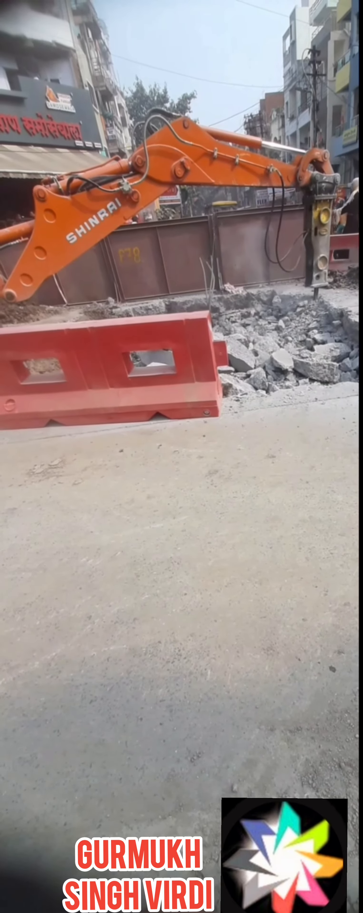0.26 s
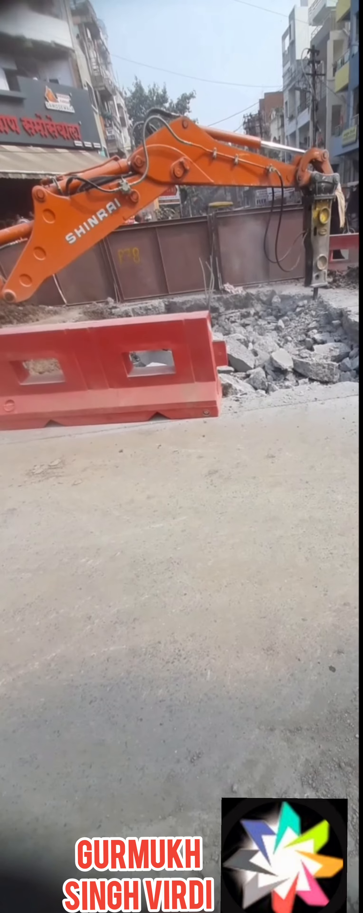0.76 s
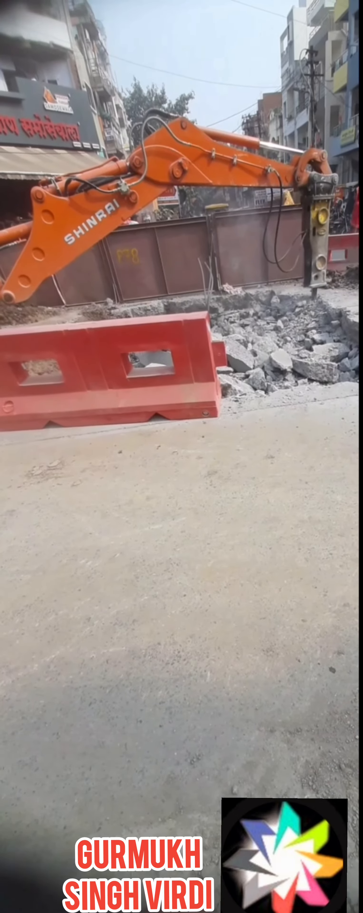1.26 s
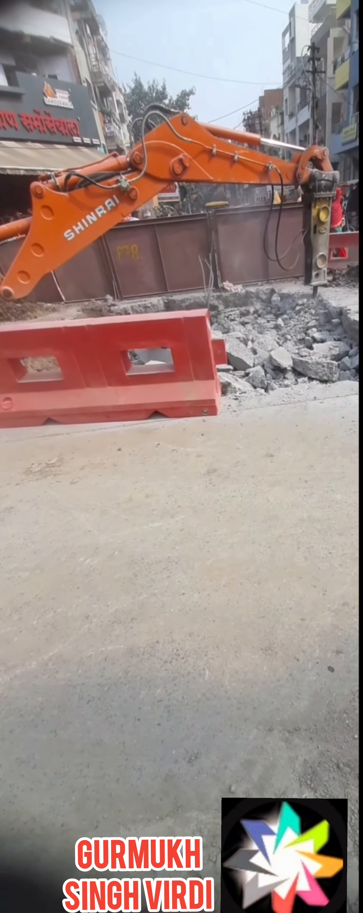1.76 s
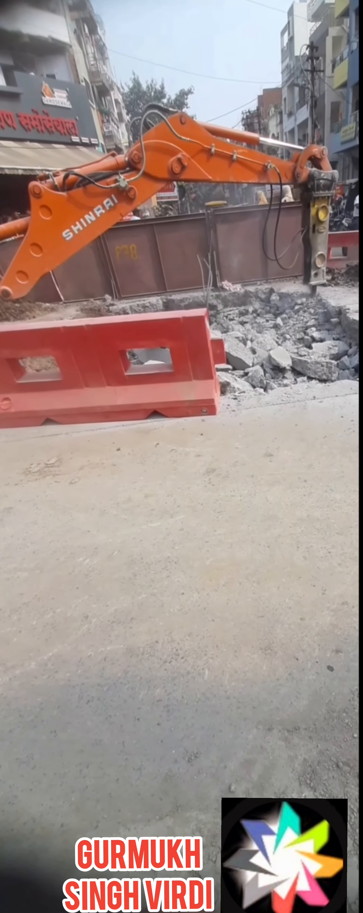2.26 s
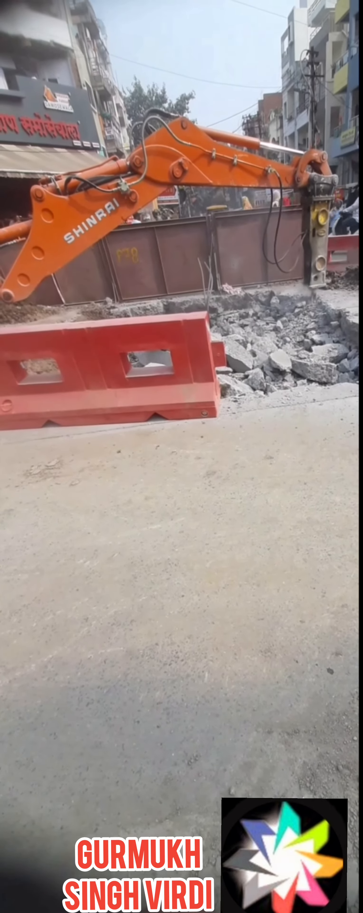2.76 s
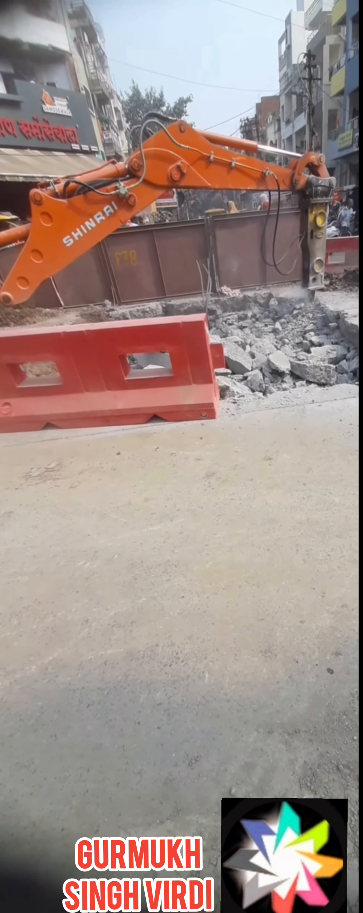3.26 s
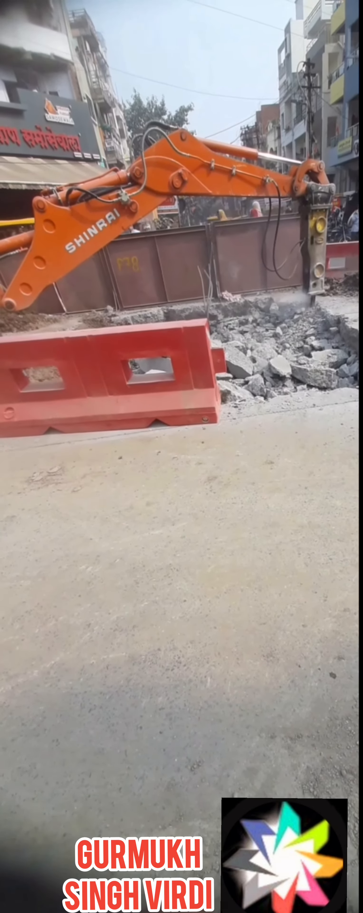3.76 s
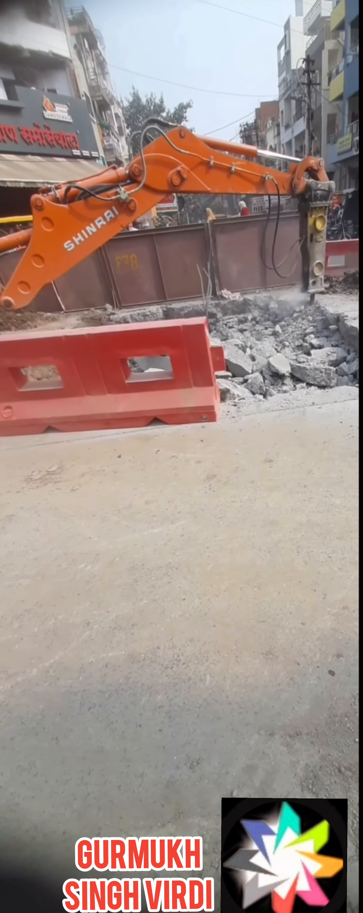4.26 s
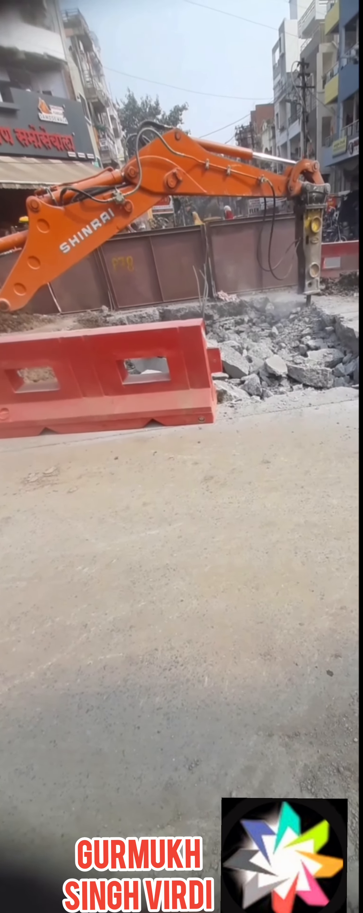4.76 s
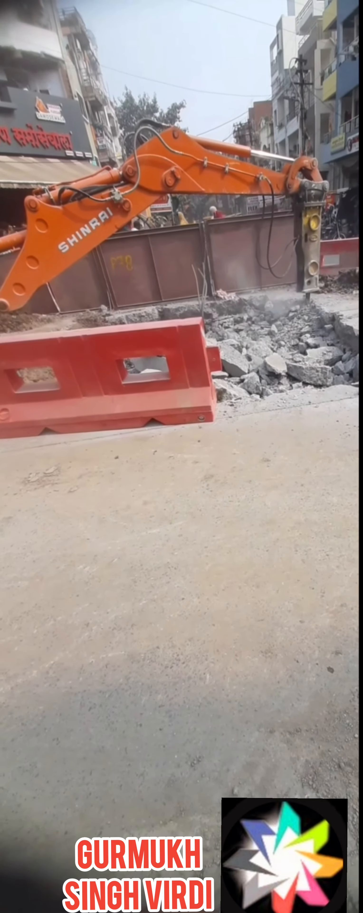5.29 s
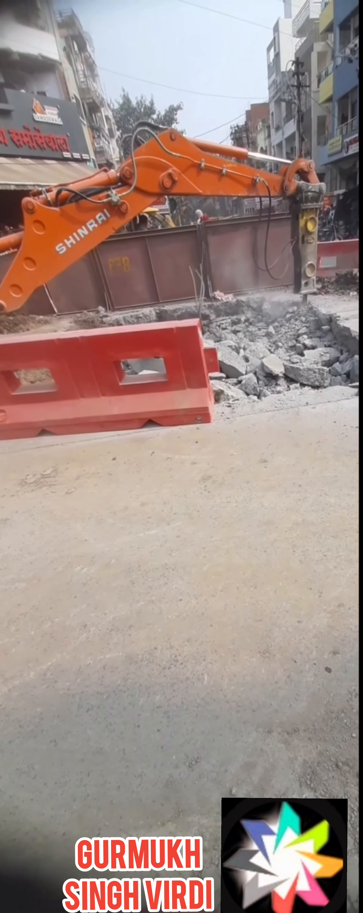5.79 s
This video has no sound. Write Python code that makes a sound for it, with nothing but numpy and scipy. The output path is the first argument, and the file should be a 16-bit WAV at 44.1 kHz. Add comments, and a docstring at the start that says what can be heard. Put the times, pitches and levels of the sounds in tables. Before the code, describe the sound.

Steady, fast jackhammering outdoors between buildings, picked up in stereo with the machine somewhat left of centre. Nearly identical bright cracks come first, with clear ringing steel and gritty chip ticks. In the middle the chisel skids, adding a hollow mid-low drone, a thin high ring and several short clanks. Then the pounding firms up, duller in its metal tone than at first. A low engine rumble fills the narrow gaps, and it ends mid-hammering.

```python
"""An excavator's hydraulic breaker pounds a concrete slab in a street, nine to ten blows a second.
Each cycle starts with valve hiss and a noise-burst crack; the jolted housing thumps, struck steel rings.
The arm drones, chips tick, and the house fronts answer with slower bursts of noise.
At first the blows are near copies of each other; later the slab gives way, the chisel skids and loose
pieces clank. From start to end, coloured noise makes the rumble of the diesel and the street."""
import sys
import numpy as np
from scipy import signal
from scipy.fft import rfft, irfft, next_fast_len
from scipy.io import wavfile
from scipy.ndimage import uniform_filter1d

SR = 44100
rng = np.random.default_rng(int(sys.argv[2]) if len(sys.argv) > 2 else 0)


def unload_wav(signal):
    """Save mono or channel-first audio to the path in sys.argv[1] as 16-bit WAV at rate SR, clipped to [-1, 1]."""
    wavfile.write(
        sys.argv[1],
        SR,
        np.round(np.clip(np.atleast_2d(signal).T, -1, 1) * 32767).astype(np.int16),
    )


N = 265923
TIME = np.arange(N) / SR                     # whole scene, s
CYCLE = (np.arange(12288) - 1764) / SR       # one blow, s after the strike

# Pace of the piston, slower while the slab gives way: t/s, rate/(blows per s)
PISTON_PACE = [(0, 9.481), (1.0, 9.561), (2.25, 9.563), (2.8, 9.339), (3.5, 9.349), (5.2, 9.541),
               (6.0, 9.479)]
FIRST_BLOW_S = 0.0492
# The chisel sinks in and later blows come late: t/s, delay/s
CHISEL_SINKS = [(0.1, 0.0026), (3.48, 0.0042), (3.8, 0.0048), (4.34, 0.0025), (5.39, 0.0026)]
# How firmly the chisel bears on the concrete: t/s, force of the blows/dB
BLOW_FORCE = [(0, -0.5), (.55, -0.9), (1.25, -1.9), (2.25, -2.54), (2.7, 1), (3.05, 1), (3.85, -2.5),
              (4.07, 0.7), (4.75, -1.1), (5.65, 0.4), (6, -.2)]
FORCE_SCATTER_DB = 0.21
THUMP_DB, THUMP_FOLLOWS = 2, 0.45            # thump at force 0 dB; share of the force's swing it follows
# Cracking of the slab: t/s, broken share/0-1
SLAB_BROKEN = [(0, 0.07), (2.35, 0), (2.7, 0.89), (3.8, 0.32), (5, 1), (6, 0.68)]
# Skidding of the chisel on rubble: t/s, skid/0-1
CHISEL_SKID = [(0, 0.09), (2.2, 0.04), (2.6, 0.76), (3.45, 0.95), (4.3, 0.72), (4.7, 0.14), (6, 0.16)]
SEAT_SHIFT = 0.39                            # how strongly a full skid changes the noise pattern per blow

# Surges of sound at strike and rebound: t after strike/s, relative peak/dB, 60 dB rise/s, 60 dB fall/s
STRIKE_SURGES = [(0, 2, 0.0092, 0.041), (0.0101, -1.8, 0.06, 0.098)]
# Colour of the crack: f/Hz, relative level per Hz/dB
CRACK_COLOUR = [(60, -39), (160, 1), (330, -2.5), (500, -1.5), (750, -2), (1050, 3), (1450, -6), (2100, 2),
                (3000, -6), (4000, -7), (5200, -4), (7900, -10.5), (8600, -12.5), (10200, -15.5),
                (11000, -11.5), (15500, -16)]
THICKET_TOP_DB = 11.5                        # cap on a small mode's peak, before the fade below 3 kHz
# Pushes that set the housing modes booming (downstroke, strike, recoil, rebound, then two weak echoes
# from the street fronts): t after strike/s, signed relative push
HOUSING_PUSHES = [(-.00315, -.9), (-.00057, -1.08), (.00228, 1), (.00832, -1.23), (.0204, -.84),
                  (.047, .28), (.0607, .27)]
# Housing modes: f/Hz, relative level/dB, 60 dB fall/s, polarity/+1 or -1
HOUSING_MODES = [(246.2, -13.5, 0.038, -1), (105.3, -27, 0.059, 1)]
# Steel of chisel and bracket, at force 0 dB and before scatter:
# f/Hz, level on whole slab/dB, level on broken slab/dB, 60 dB fall/s
STEEL_MODES = [(356, -52, -50, 0.082), (407.3, -36.5, -49, 0.9), (450, -30, -46, 0.37),
               (505.6, -34.5, -31, 0.38), (672.4, -23.5, -43.5, 0.35), (756, -29.5, -61, 0.26),
               (898, -24.5, -28, 0.13), (975, -34, -26.5, 0.056), (1078, -21.5, -55, 0.16),
               (1134, -41, -24, 0.13), (1225, -31.5, -26, 0.17), (1446, -22.5, -39, 0.11),
               (1440, -55.5, -56, 0.14), (1854, -27.5, -48, 0.17), (1820, -21.5, -25, 0.11),
               (2030, -45, -32, .11), (2380, -22.5, -55, 0.14), (2180, -38, -18, 0.19),
               (2273, -26.5, -58, 0.29), (2186, -20, -39, 0.15), (2692, -30, -30, 0.14),
               (3203, -26.5, -34, 0.21), (3263, -23.5, -28.5, 0.074)]
CHISEL_HZ, CHISEL_T60_S = 4530, 0.28
# A firm seat damps the chisel's ring
CHISEL_SEATED_DB, CHISEL_SKIDDING_DB, CHISEL_SCATTER_DB = -32, -26.5, 2.5
# Boom of the arm, droning when the chisel skids: f/Hz, relative level/dB, 60 dB fall/s
BOOM_MODES = [(320, -4, 0.2), (358.5, -13, 0.43)]
BOOM_SEATED_DB, BOOM_SKIDDING_DB = -46, -12.5
# Loose pieces knocked by the chisel: t/s, f/Hz, level/dB
LOOSE_CLANKS = [(3.324, 1122, -17), (3.426, 1607, -14.5), (3.427, 726, -19), (3.539, 1850, -18.5),
                (3.540, 1660, -23), (3.752, 1550, -15.5), (3.753, 708, -20), (3.755, 1590, -19),
                (4.288, 1710, -29), (5.345, 1924, -15)]
CLANK_T60_S = 0.094
# Valve opens, then oil drives the piston down: t after strike/s, relative peak/dB, 60 dB rise/s, 60 dB fall/s
HISS_SURGES = [(-.0215, 2.5, 0.0074, 0.043), (-.012, -2, 0.028, 0.045)]
# Colour of the valve's hiss: f/Hz, relative level per Hz/dB
HISS_COLOUR = [(150, -13), (500, -2), (1400, 3.5), (2500, 2.5), (5200, 5.5), (7500, 5), (9500, -8.5),
               (12000, -1), (15500, -2)]
# Answers of near walls, a flat house front and far houses:
# t after strike/s, relative peak/dB, 60 dB rise/s, 60 dB fall/s
ECHO_SURGES = [(.018, 2, .009, 0.3), (.0635, -0.5, 0.017, 0.019), (.1, -2.5, 0.18, .083)]
# Colour of the street's answer: f/Hz, relative level per Hz/dB
ECHO_COLOUR = [(30, -38), (60, -11), (100, -2), (160, -1.5), (240, 3), (330, -2.5), (500, -11),
               (1000, -7.5), (2200, -13.5), (5000, -17.5), (8000, -24.5), (15000, -31.5)]
# Colour of the diesel and street rumble: f/Hz, relative level per Hz/dB
RUMBLE_COLOUR = [(20, -26), (35, -33), (60, -13.5), (110, -6), (170, -8.5), (260, -5.5), (500, -15),
                 (1500, -24), (5000, -29.5), (15000, -59)]
# Level difference of two microphones: f/Hz, left minus right/dB
MIC_BALANCE = [(60, 6.0), (110, 5.5), (200, 2.0), (380, 0.0), (700, 4.5), (1290, 2.0), (2380, -0.5),
               (4400, 2.0), (8120, 3.0), (15000, 4.5)]
# Phase difference of two microphones: f/Hz, lead of the left/radians
MIC_LEAD = [(110, 0.51), (250, 0.36), (400, 0.8), (700, 1.45), (1000, 1.26), (1900, 1.95), (2300, 4.56),
            (3000, 4.7), (3600, 6.44), (5000, 6.9), (8000, 0.68), (11000, 11.3)]
# How alike noise is at the two microphones: f/Hz, likeness/0-1
MIC_LIKENESS = [(30, 0.96), (80, 0.83), (250, 0.91), (550, 0.92), (2500, 0.077), (5000, 0.17),
                (14000, 0.17)]


def blow_times():
    """The piston, already running, strikes once a cycle, and a little later each time the chisel has sunk."""
    cycles = np.cumsum(along(PISTON_PACE, TIME)) / SR
    cycles -= np.interp(FIRST_BLOW_S, TIME, cycles)
    before = FIRST_BLOW_S - 1 / along(PISTON_PACE, 0)
    times = np.r_[before, np.interp(np.arange(int(cycles[-1]) + 1), cycles, TIME)]
    return times + sum(delay * (times > s) for s, delay in CHISEL_SINKS)


def crack(times, force_db):
    """The strike and rebound of the piston crack the concrete: two surges of noise per blow."""
    return amp(-24.5) * bursts(times, STRIKE_SURGES, CRACK_COLOUR, force_db,
                               fresh_hz=4440, fresh_floor=0.015, modes_db=1.0, patchy_db=2.0)


def hardness(x, corner_hz, whole_db, broken_db):
    """Solid concrete gives a brighter crack than rubble."""
    low_pass = signal.butter(1, corner_hz, fs=SR, output="sos")
    treble = x - signal.sosfilt(low_pass, x)
    return x + treble * (amp(blend(SLAB_BROKEN, TIME, whole_db, broken_db)) - 1)


def housing(times, thump_db, radiating_hz):
    """Jolts make the housing boom, and two weak echoes follow; it is too small to radiate deep bass."""
    drive = sum(clicks(times + delay, push * amp(thump_db)) for delay, push in HOUSING_PUSHES)
    motion = sum(polarity * amp(db) * ring(drive, hz, t60) for hz, db, t60, polarity in HOUSING_MODES)
    return signal.sosfilt(signal.butter(2, radiating_hz, "high", fs=SR, output="sos"), motion)


def steel(times, force_db, scatter_db, travel_s):
    """Each blow rings the steel; the balance of its modes shifts as the slab breaks."""
    chance = rng.standard_normal((len(STEEL_MODES), len(times)))
    delays = rng.uniform(0, travel_s, len(STEEL_MODES))   # the shock reaches each part at its own time
    out = np.zeros(N)
    for (hz, whole_db, broken_db, t60), luck, delay in zip(STEEL_MODES, chance, delays):
        db = blend(SLAB_BROKEN, times, whole_db, broken_db) + force_db + scatter_db * luck
        out += ring(clicks(times + delay, amp(db)), hz, t60)
    return out


def chisel(times):
    """The struck chisel sings one high note, louder when it skids freely."""
    db = blend(CHISEL_SKID, times, CHISEL_SEATED_DB, CHISEL_SKIDDING_DB)
    db = db + CHISEL_SCATTER_DB * rng.standard_normal(len(times))
    return ring(clicks(times, amp(db)), CHISEL_HZ, CHISEL_T60_S)


def boom(times, lag_s):
    """The recoil travels up the arm and leaves it droning."""
    db = blend(CHISEL_SKID, times, BOOM_SEATED_DB, BOOM_SKIDDING_DB)
    drive = clicks(times + lag_s, amp(db))
    return sum(amp(db) * ring(drive, hz, t60) for hz, db, t60 in BOOM_MODES)


def loose_pieces():
    """Freed lumps give short pitched clanks."""
    return sum(ring(clicks(np.array([s]), amp([db])), hz, CLANK_T60_S) for s, hz, db in LOOSE_CLANKS)


def chips(times, level_db, size_db, flight_s, cycles):
    """Every blow throws off chips of concrete, which tick briefly at fourteen pitches."""
    out = np.zeros((2, N))
    for hz in np.geomspace(1300, 11000, num=14):
        lands = times + 0.0088 + rng.exponential(flight_s, len(times))
        sizes = amp(size_db * np.clip(rng.standard_normal(len(times)), -2, 1.5))
        ticks = ring(clicks(lands, sizes), hz, cycles / hz)
        out += ticks * rng.uniform(-1.4, 1, (2, 1))   # random strength and sign in each microphone
    return amp(level_db) * rms_one(out)


def valve(times):
    """Oil rushing through the valve hisses just before each strike, equally hard for every blow."""
    return amp(-33.5) * bursts(times, HISS_SURGES, HISS_COLOUR, np.zeros(len(times)),
                               fresh_hz=8050, fresh_floor=0.21, modes_db=4.0, patchy_db=3.5)


def street(times, thump_db):
    """Walls and house fronts send each blow back as delayed surges of noise."""
    return amp(-28.0) * bursts(times, ECHO_SURGES, ECHO_COLOUR, thump_db,
                               fresh_hz=4000, fresh_floor=0.028, modes_db=0.0, patchy_db=3.0)


def diesel(level_db):
    """Steady rumble of the engine and the street, made of coloured noise."""
    hz = np.fft.rfftfreq(2 * next_fast_len(N // 2 + 1), 1 / SR)
    noise = irfft(noise_pair(hz, count=1)[0] * amp(at_hz(RUMBLE_COLOUR, hz)))
    return amp(level_db) * rms_one(noise[:, :N])


def microphones(x):
    """The two microphones hear everything with different level and phase."""
    size = 2 * next_fast_len(N // 2 + len(CYCLE))
    hz = np.fft.rfftfreq(size, 1 / SR)
    left = amp(at_hz(MIC_BALANCE, hz) / 2) * np.exp(1j * at_hz(MIC_LEAD, hz) / 2)
    return irfft(rfft(x, size) * np.array([left, 1 / left]))[:, :N]


def bursts(times, surges, colour, blow_db, fresh_hz, fresh_floor, modes_db, patchy_db):
    """Noise that recurs with every blow; it drifts as the chisel shifts, and much of its treble is new."""
    hz = np.fft.rfftfreq(len(CYCLE), 1 / SR)
    pattern = noise_pair(hz, count=len(times))
    for k, shift in enumerate(blend(CHISEL_SKID, times[1:], 0, SEAT_SHIFT), 1):
        kept = np.exp(-shift * np.minimum(hz / 1300, 2))   # short waves feel a shift first
        pattern[k] = kept * pattern[k - 1] + np.sqrt(1 - kept ** 2) * pattern[k]
    fresh = np.clip(fresh_floor + hz ** 2 / (hz ** 2 + fresh_hz ** 2), 0, 0.8)
    grain = np.sqrt(1 - fresh) * pattern + np.sqrt(fresh) * noise_pair(hz, count=len(times))

    # The treble is a thicket of small modes, and each blow favours different ones
    thicket_db = modes_db * ripple(hz, width_hz=70, count=1)
    thicket_db = thicket_db + patchy_db * ripple(hz, width_hz=160, count=len(times))
    thicket_db = np.minimum(thicket_db, THICKET_TOP_DB) * np.minimum(hz / 3000, 1)
    grain = irfft(grain * amp(thicket_db))

    # Shape in time, then even out the broad spectrum and give it the wanted colour
    spectra = rfft(grain * envelope(surges))
    power = np.mean(abs(spectra) ** 2, axis=0)
    power = np.where(hz < 1500, uniform_filter1d(power, size=40), uniform_filter1d(power, size=240))
    waves = irfft(spectra / np.sqrt(power) * amp(at_hz(colour, hz)))

    margin = len(CYCLE)   # room for bursts that cross either end
    out = np.zeros((2, N + 3 * margin))
    for s, db, wave in zip(times, blow_db, waves):
        start = margin + round((s + CYCLE[0]) * SR)
        out[:, start:start + len(CYCLE)] += amp(db) * wave
    return rms_one(out[:, margin:margin + N])


def envelope(surges):
    """Each surge swells and dies away; their powers add over one cycle."""
    power = 0
    for s, db, attack, t60 in surges:
        fade = np.maximum((s - CYCLE) / attack, (CYCLE - s) / t60)
        power = power + (amp(db) * np.exp(-np.log(1000) * fade)) ** 2
    return np.sqrt(power)


def noise_pair(hz, count):
    """Random spectra for two microphones, as alike as the likeness table says."""
    draws = rng.standard_normal((2, count, 1, 2 * len(hz)), dtype=np.float32)
    mid, side = draws.view(np.complex64)
    alike = np.clip(at_hz(MIC_LIKENESS, hz), 0, 1)
    return np.sqrt(1 + alike) * mid + np.sqrt(1 - alike) * side * np.array([[1], [-1]])


def ripple(hz, width_hz, count):
    """Rows of random peaks and dips along frequency, with rms 1."""
    noise = rng.standard_normal((count, 1, len(hz)))
    return rms_one(uniform_filter1d(noise, max(int(width_hz / hz[1]), 1)))


def clicks(s, sizes):
    """Impulses at the given times; those outside the scene are left out."""
    places = np.clip(np.round(s * SR).astype(int), 0, N)
    return np.bincount(places, sizes * (s >= 0), N + 1)[:N]


def ring(drive, hz, t60):
    """A unit click sets off a sine that starts at height 1 and falls 60 dB in t60 seconds."""
    r, w = np.exp(-np.log(1000) / (t60 * SR)), 2 * np.pi * hz / SR
    return signal.lfilter([0, np.sin(w)], [1, -2 * r * np.cos(w), r * r], drive + 1e-18)


def along(curve, s):
    """Read a control curve at the given times."""
    return np.interp(s, *np.transpose(curve))


def blend(curve, s, low, high):
    """Go from low to high as a 0-1 control rises."""
    return low + (high - low) * np.clip(along(curve, s), 0, 1)


def at_hz(points, hz):
    """Read a table along log frequency."""
    f, value = np.transpose(points)
    return np.interp(np.log(hz + 1), np.log(f), value)


def amp(db):
    """Decibels to gain."""
    return 10 ** (np.asarray(db) / 20)


def rms_one(x):
    """Scale to unit rms."""
    return x / np.sqrt(np.mean(x ** 2) + 1e-20)


def scene():
    """Strike, ringing, chips, valve and street echo, over the engine's rumble."""
    times = blow_times()
    force_db = along(BLOW_FORCE, times) + FORCE_SCATTER_DB * rng.standard_normal(len(times))
    thump_db = THUMP_DB + THUMP_FOLLOWS * force_db
    blows = crack(times, force_db) + street(times, thump_db)
    concrete = hardness(blows, corner_hz=5000, whole_db=2.7, broken_db=0.5)
    body = housing(times, thump_db, radiating_hz=66) + boom(times, lag_s=0.00842)
    metal = steel(times, force_db, scatter_db=1.0, travel_s=0.01) + chisel(times)
    debris = loose_pieces() + chips(times, level_db=-40.5, size_db=2.5, flight_s=0.034, cycles=20.0)
    return microphones(concrete + body + metal + debris + valve(times) + diesel(level_db=-29.5))


def record(dry):
    """The deepest bass is weakened, the highest peaks are clipped and the top is cut."""
    thin = signal.sosfilt(signal.butter(2, 38, "high", fs=SR, output="sos"), dry)
    steep = signal.ellip(12, 0.1, 90, 15600, fs=SR, output="sos")
    return signal.sosfilt(steep, np.clip(thin, -1, 1))


dry = scene()
out = record(dry)
unload_wav(out)
```